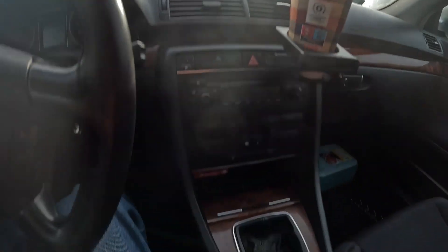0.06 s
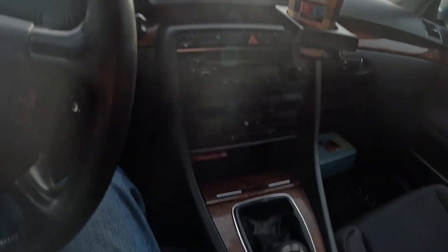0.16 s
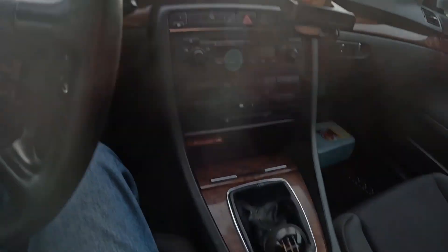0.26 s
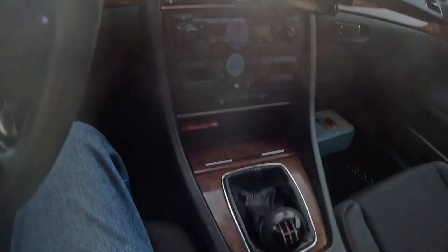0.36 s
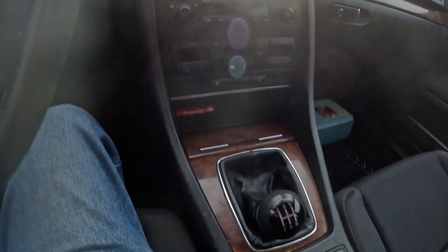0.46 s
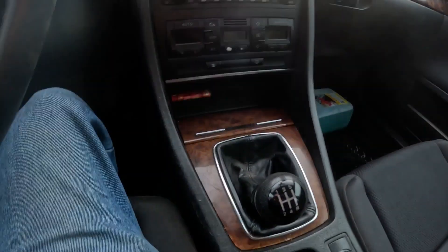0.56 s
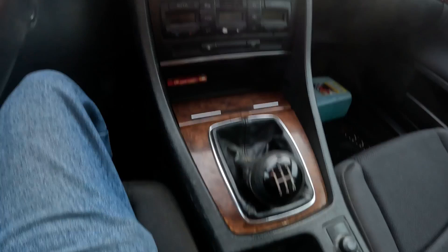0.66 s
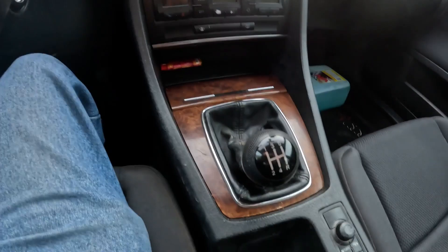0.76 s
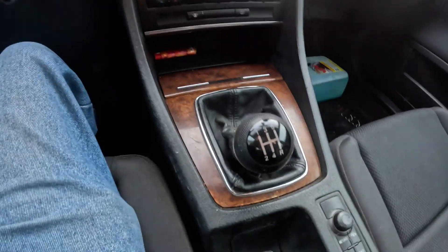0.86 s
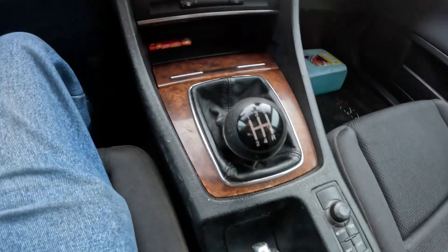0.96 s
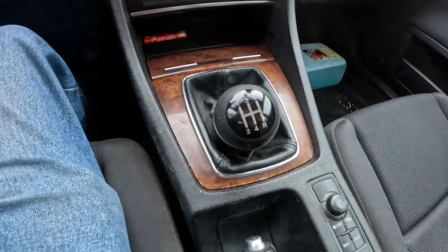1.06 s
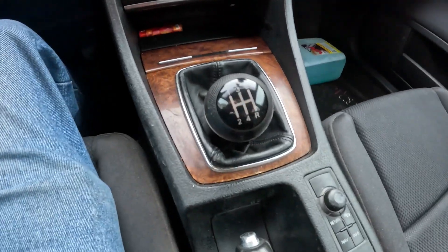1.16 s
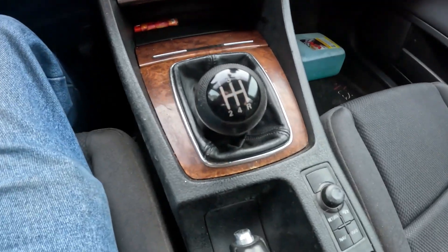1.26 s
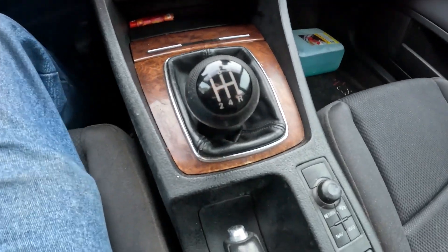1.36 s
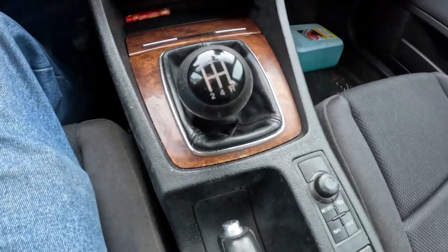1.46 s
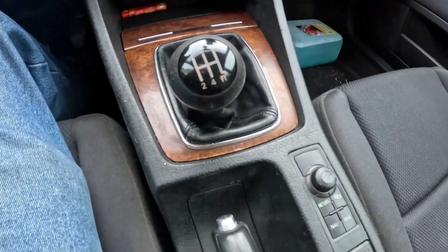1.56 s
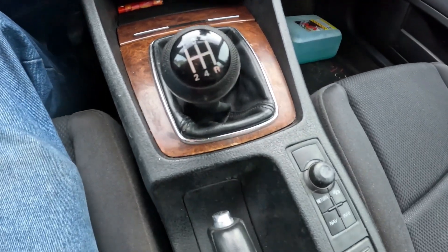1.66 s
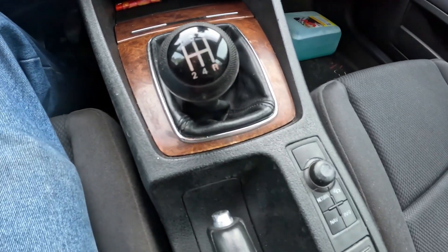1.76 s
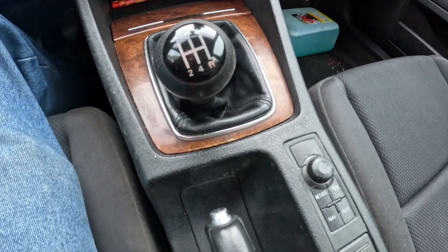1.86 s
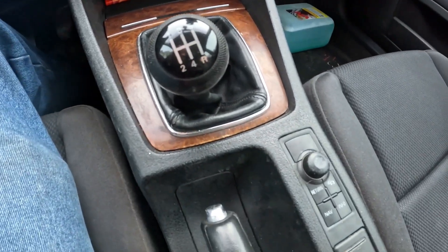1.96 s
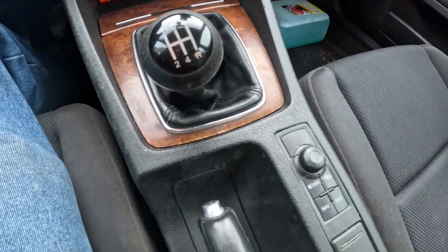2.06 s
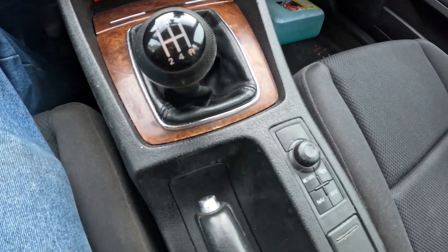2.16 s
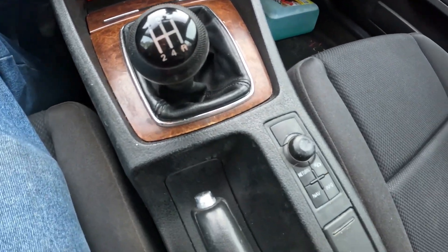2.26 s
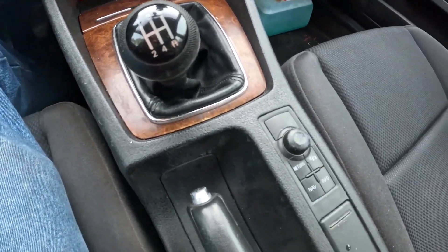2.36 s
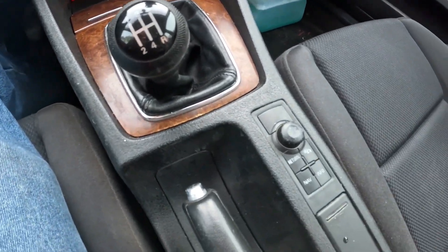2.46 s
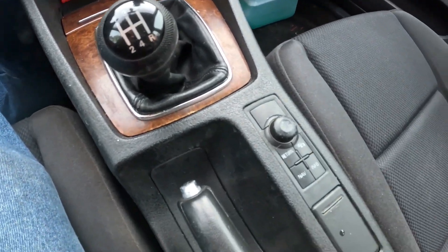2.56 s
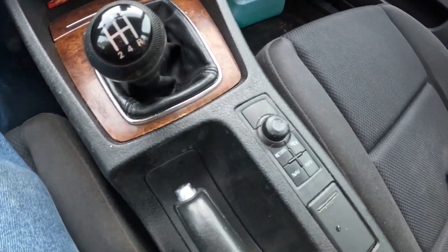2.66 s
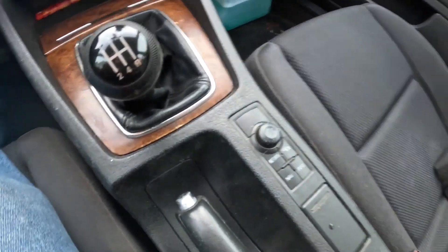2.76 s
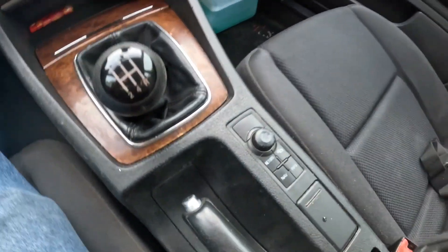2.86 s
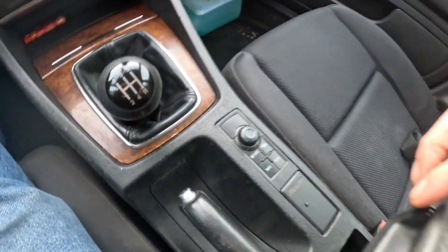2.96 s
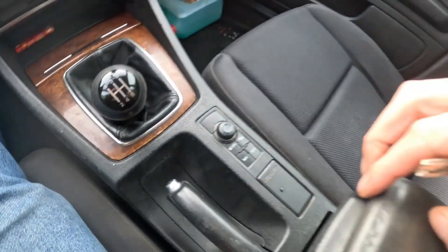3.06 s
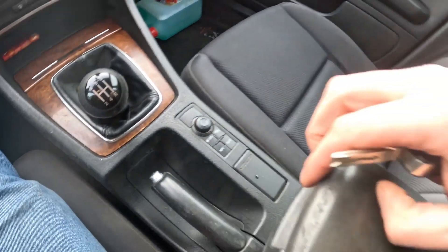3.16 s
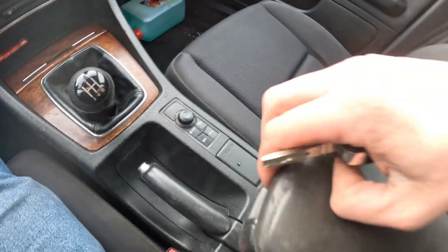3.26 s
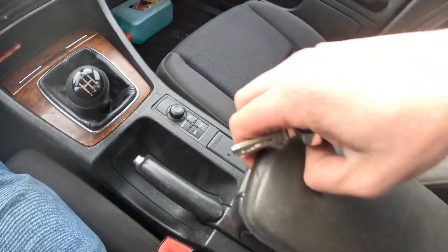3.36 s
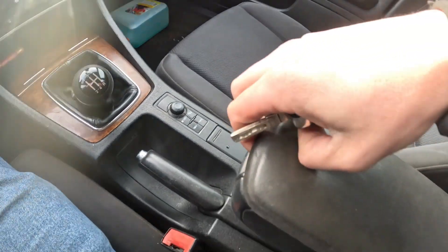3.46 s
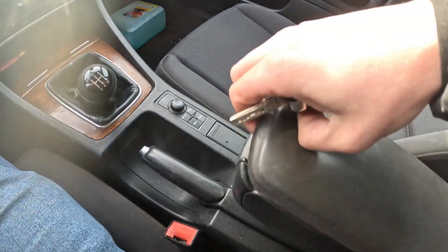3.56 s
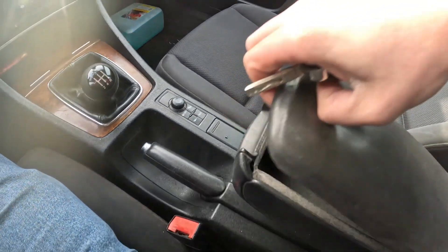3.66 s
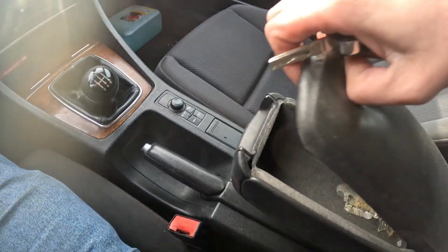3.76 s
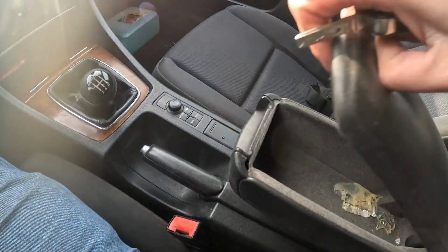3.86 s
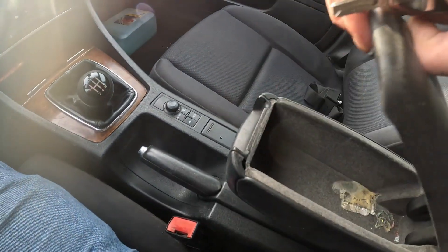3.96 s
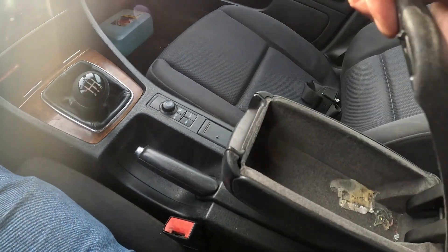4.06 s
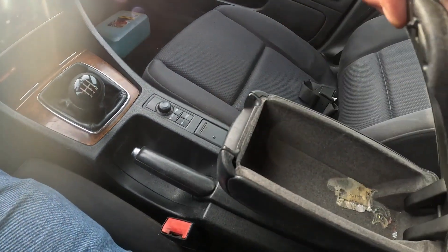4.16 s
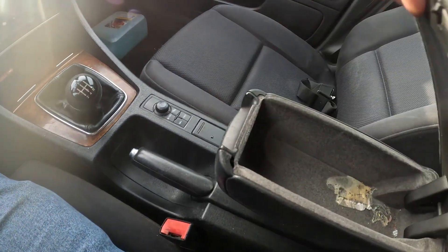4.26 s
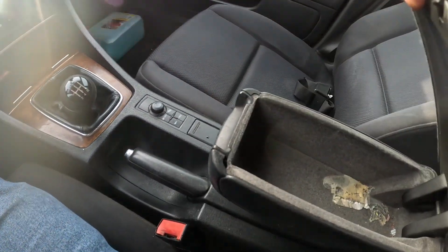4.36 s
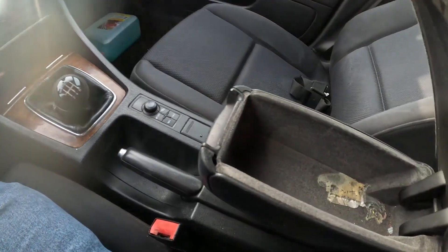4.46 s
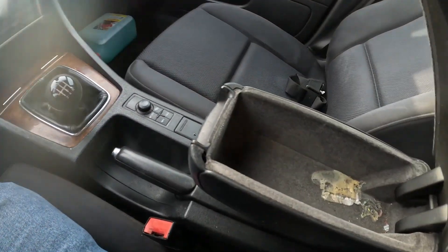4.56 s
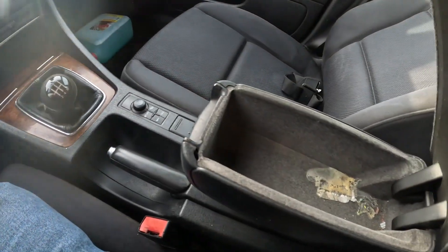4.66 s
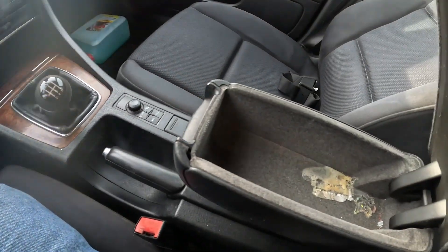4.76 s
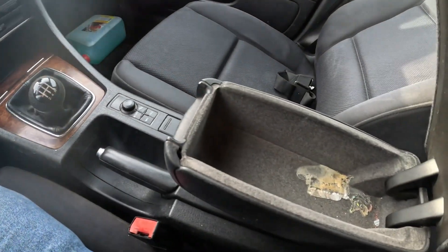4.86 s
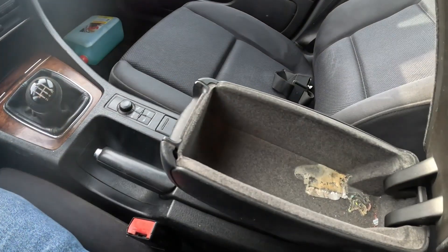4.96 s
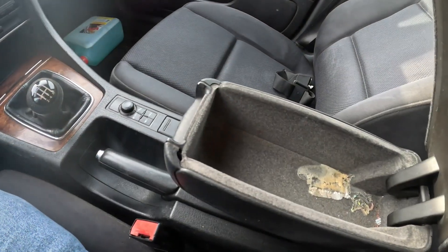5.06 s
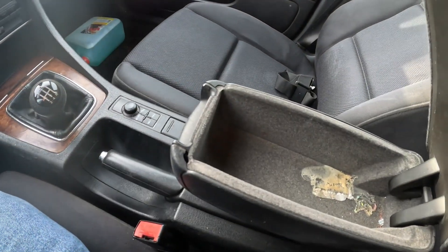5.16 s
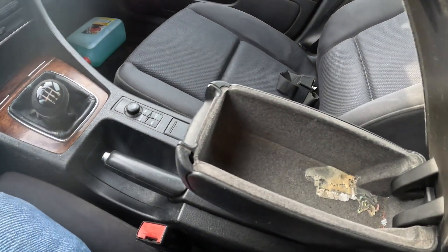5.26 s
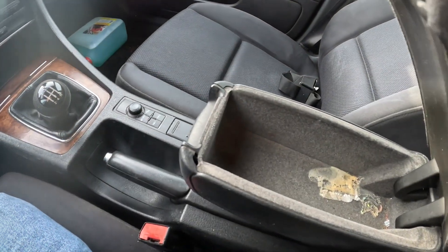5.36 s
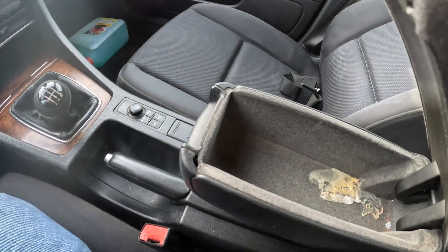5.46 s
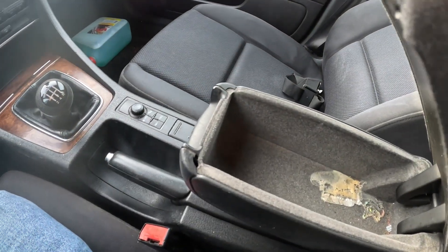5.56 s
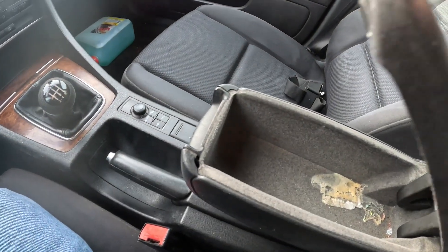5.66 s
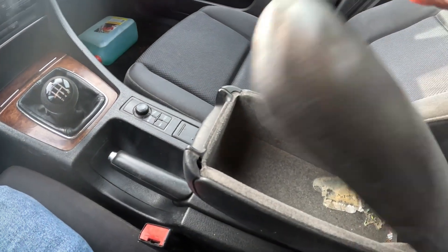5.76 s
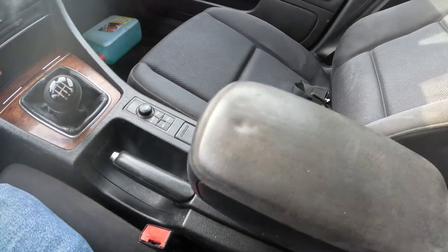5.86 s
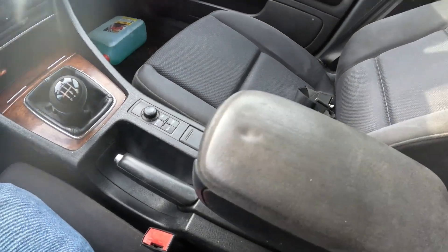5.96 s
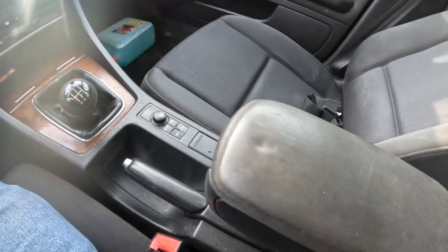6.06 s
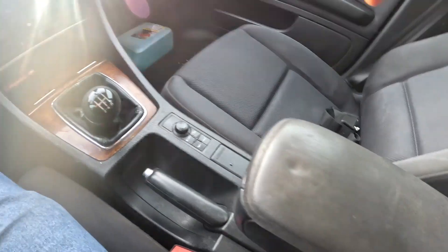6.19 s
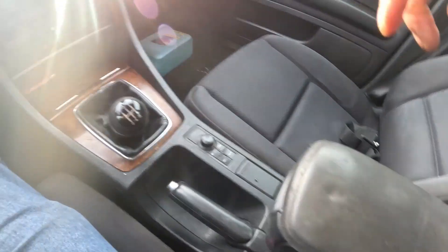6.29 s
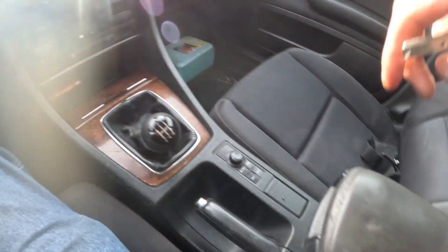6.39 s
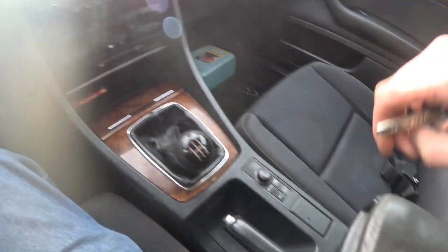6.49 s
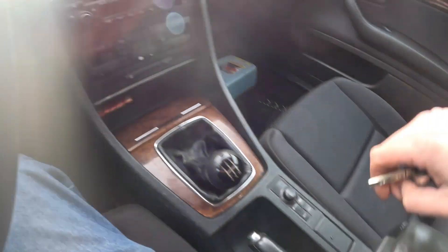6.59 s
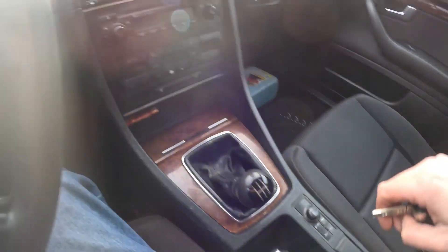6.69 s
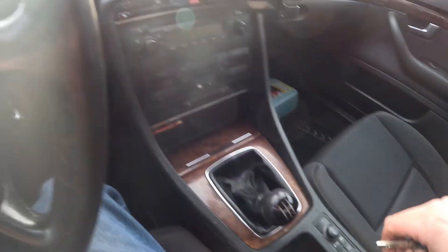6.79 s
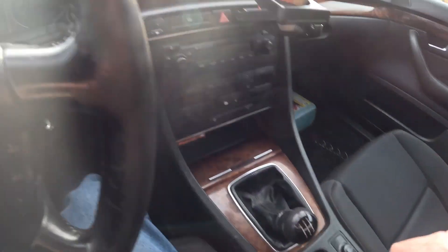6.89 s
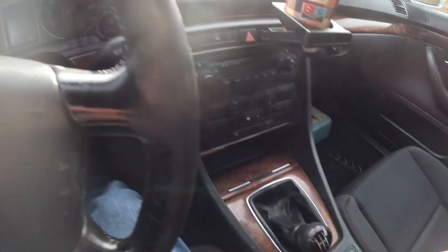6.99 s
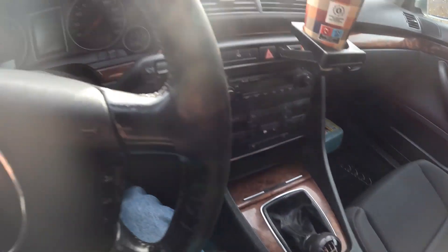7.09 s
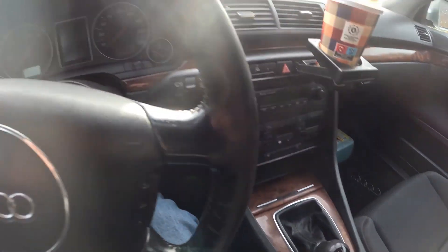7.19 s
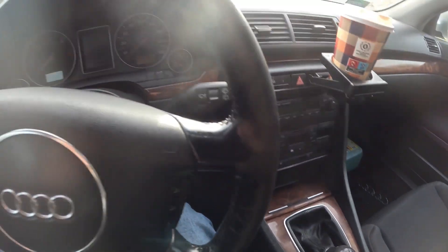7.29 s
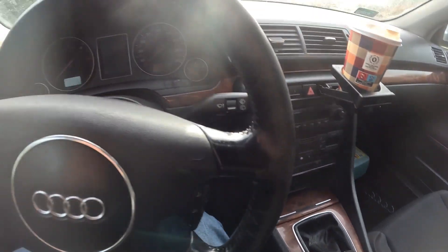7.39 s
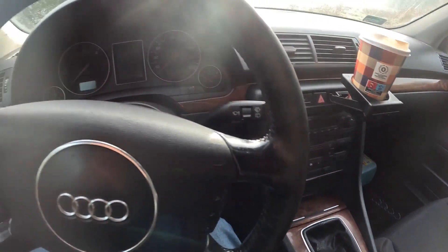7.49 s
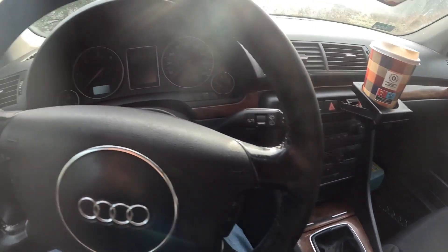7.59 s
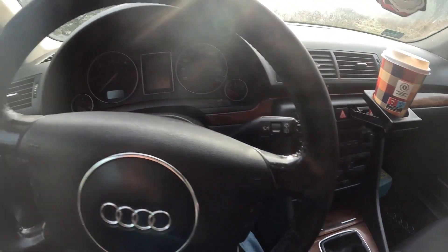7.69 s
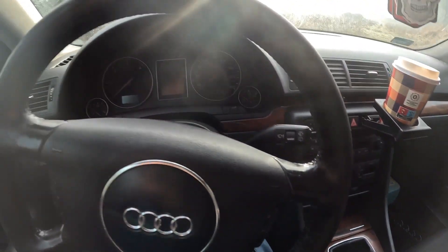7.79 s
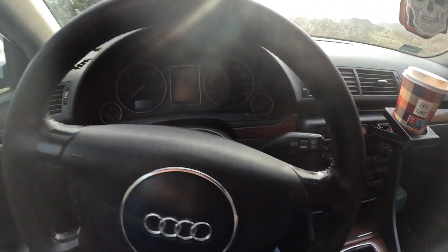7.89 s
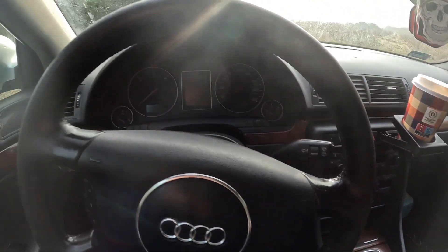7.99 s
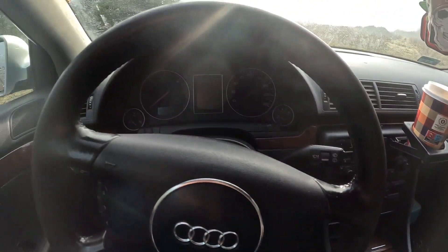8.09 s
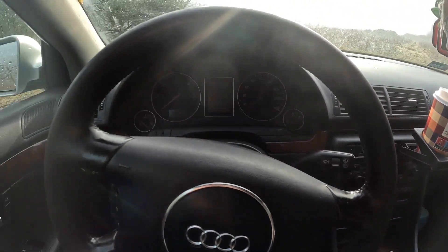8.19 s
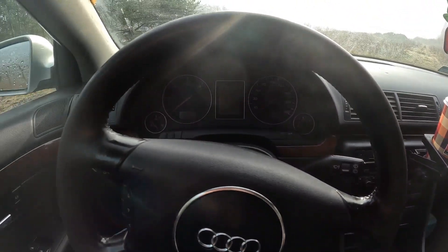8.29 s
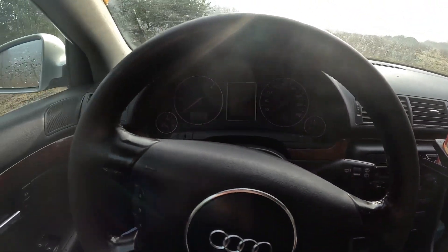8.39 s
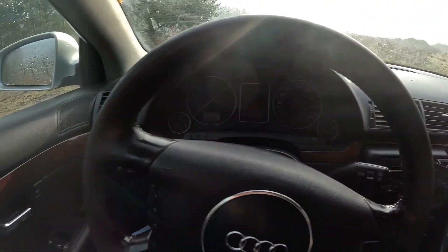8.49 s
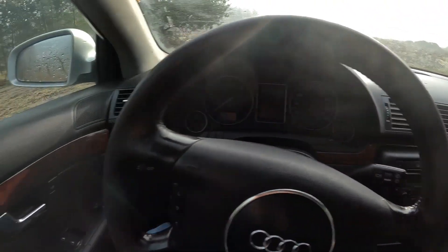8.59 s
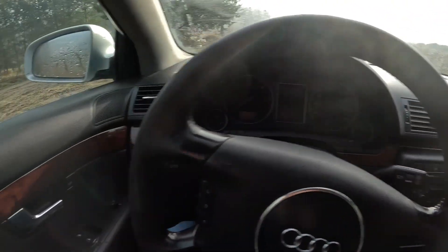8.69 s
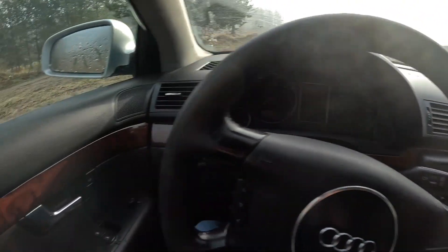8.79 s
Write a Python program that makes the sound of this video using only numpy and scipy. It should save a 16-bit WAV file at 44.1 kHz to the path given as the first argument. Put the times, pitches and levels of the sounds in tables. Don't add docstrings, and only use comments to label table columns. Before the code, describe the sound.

Faint cloth movement in a still car cabin, creaky fumbling and clicks as an armrest opens, one sharp hollow slam, then a tiny plastic ratchet.

```python
import sys
import numpy as np
from scipy import signal
from scipy.fft import rfft, irfft, next_fast_len
from scipy.io import wavfile
from scipy.ndimage import uniform_filter1d

SR = 44100
rng = np.random.default_rng(int(sys.argv[2]) if len(sys.argv) > 2 else 0)


def to_wav(s):
    ch = np.atleast_2d(s).T
    pcm = np.round(np.clip(ch, -1, 1) * 32767)
    wavfile.write(sys.argv[1], SR, pcm.astype(np.int16))


def volts_from_decibels(level):
    exponent = np.asarray(level, float) / 20
    return 10 ** exponent


N = 389844
T = np.arange(N) / SR

# t/s, push/dB, contact/ms, crack/dB, box pitch/factor
BLOWS = [
    (5.881, -46, 0.58, -46, 0.78),
    (5.8864, -25.5, 1.1, -44, 1.45),
    (5.8985, -15, 0.92, -27, 1.3),
    (5.9034, -15, 1.1, -28.5, 1.63),
    (5.9097, -1, 0.18, -6, 1),
]
BOUNCES = [
    (5.9918, -18, 0.7, -27.5, 0.95),
    (6.0326, -24, 1, -42, 1.05),
]
# f/Hz, level/dB, t60/s
BOX_MODES = [(64.3, -20, 0.17), (150, -23, 0.048), (215, 2, 0.061), (300, -4, 0.038), (355, -7, 0.022),
             (530, -23.5, 0.05), (700, -14, .03), (880, -7.5, 0.029), (1076, 1, 0.013), (1570, -9, 0.01),
             (2900, -11, .008), (3650, -10.5, 0.0055), (4430, -15, .008)]
# f/Hz, level/dB per Hz
CRACK_COLOUR = [(180, -21.5), (300, -15), (544, -29), (1130, -16), (1880, -19.5), (2190, -33),
                (2460, -26.5), (3480, -25.5), (4310, -34.5), (7830, -39.5), (15700, -66.5)]
# f/Hz, level/dB per Hz
CLATTER_COLOUR = [(250, -10), (450, 0.5), (700, 0), (1150, -3.5), (1600, -12.5), (2400, -24)]

# t/s, peak level/dB, snap level/dB, note f/Hz
CLICKS = [(1.068, -31.5, -17, 1260), (1.957, -43, 2.5, 1100), (2.898, -37, -1, 704),
          (3.821, -25.5, -11, 630), (3.885, -24, -4, 1180), (4.046, -23, -2, 1410), (4.146, -24.5, 0, 1240),
          (4.571, -35, -7.5, 470), (4.653, -27, -7, 704), (5.258, -28.5, -3.5, 1280),
          (7.964, -38, 5.5, 647)]
KNOCKS = [(.92, -34.5, -11.5, 1300), (2.834, -28.5, -1.5, 1570), (2.949, -41, 5, 657),
          (3.017, -24.5, -7, 1270), (3.36, -21, -11, 1110), (3.4, -33, -6.5, 670), (3.51, -26, 0.5, 1140),
          (3.558, -25.5, -12.5, 1130), (3.606, -17, -8, 593), (3.618, -18.5, -15, 426),
          (3.797, -34, -17, 650), (4.635, -23, -10, 1630), (5.467, -40.5, -30, 1030),
          (7.413, -45.5, -15, 1450), (8.774, -45.5, -34.5, 668)]
SETTLES = [(.76, -51, -6, 1200), (.893, -44.5, -13.5, 620), (2.789, -44, -10, 1270),
           (3.467, -35.5, -5, 980), (3.533, -27.5, -9.5, 980), (3.636, -37, -25, 636),
           (4.878, -47.5, -36, 970), (5.268, -37, -16, 1510), (5.574, -50.5, -30, 1050),
           (5.485, -52.5, -30, 1390), (7.316, -50, -30, 1220)]
# t/s, peak level/dB, note f/Hz
CRISP = [(.043, -48, 470), (.264, -54, 700), (.563, -53, 865), (5.718, -54.5, 2040), (1.443, -49, 1550),
         (1.479, -47, 640), (3.973, -47, 1610), (4.61, -52, 1580), (5.808, -44, 440), (6.045, -46, 2900),
         (6.769, -46.5, 8050), (6.793, -49.5, 641), (.435, -61, 610), (1.593, -48.5, 3200),
         (2.985, -46, 4500), (2.997, -35.5, 1300), (6.477, -55.5, 1300), (6.875, -54, 1198),
         (7.865, -58.5, 1300), (4.928, -56, 6000)]
DULL = [(1.523, -45, 1210), (2.89, -35, 740), (2.926, -32.5, 1320), (3.431, -37, 467), (3.733, -50, 583),
        (3.759, -37, 640), (3.783, -37, 636), (3.886, -31.5, 2220), (4.047, -31, 2170), (4.147, -32, 2160),
        (1.958, -50.5, 750), (4.4, -55, 700), (4.148, -36, 750), (3.575, -34, 1000), (5.484, -40.5, 517),
        (7.365, -45, 875), (7.439, -47, 1540)]
# f/Hz, level/dB per Hz
KNOCK_COLOUR = [(210, -34.5), (350, -19), (604, 5), (934, 4.5), (1550, 2.5), (1810, -7.5), (2160, -11),
                (2600, -13), (3380, -41.5), (5720, -120)]
# f/Hz, level/dB per Hz
SNAP_COLOUR = [(1120, -34), (1900, -8), (2750, -4), (3140, -1), (3920, -6.5), (6430, -10.5), (8160, -18.5),
               (9240, -22), (13400, -37.5), (15700, -51)]
# f/Hz, level/dB per Hz
THUD_COLOUR = [(35, -39.5), (60, -7), (182, 1), (280, 6), (400, 1.5), (449, -3), (534, -20), (600, -14.5),
               (780, -13), (1320, -120)]

# peak t/s, rise/s per 10 dB, fall/s per 10 dB, peak level/dB, hiss over cloth/dB
SHIFTS = [(0, .1, 0.6, -74.5, 0.5), (.88, 0.38, 0.35, -63, -7), (1.2, 0.29, 0.03, -63.5, -4),
          (1.48, 0.35, 0.33, -72, -4.5), (1.68, 0.34, 0.08, -64.5, -3.5), (2.04, 1.5, 1.5, -81.5, 0),
          (2.6, 0.27, 0.15, -71, -2.5), (6.5, 0.33, 0.5, -71, -4), (7.0, 0.2, -0.07, -63.5, 0),
          (7.4, 1.08, 0.5, -68, -7), (7.57, 0.42, -0.08, -69, 0.5), (7.9, 0.4, 0.17, -79, -2.5),
          (8.83, 0.24, -6.8, -71.5, -2)]
HANDLING = [(2.82, 0.055, 0.21, -58, -4), (2.99, 0.16, 0.13, -53.5, -8), (3.33, 0.25, 0.16, -48.5, -8),
            (3.6, 0.77, 0.081, -58, -3.5), (3.79, 0.23, 0.34, -61, -5.5), (4.3, 0.57, 0.08, -67, -4.5),
            (4.5, 0.11, 0.21, -68.5, -7.5), (4.62, 0.079, 0.11, -59.5, -6), (4.89, 0.16, 0.19, -71.5, 0),
            (5.29, 0.13, 0.079, -66.5, -5), (5.37, 0.063, 0.082, -67, -6), (5.76, 0.044, 0.4, -69.5, -1.5),
            (5.91, 0.036, 0.021, -45.5, -14.5), (6.02, 0.07, 0.046, -63, -17)]
# t/s, level/dB
LOAD = [(0, -75), (.35, -80.5), (.95, -65.5), (1.36, -74.5), (1.6, -73), (2.75, -79.5), (2.83, -69.5),
        (3.63, -48), (3.96, -79), (5.09, -79), (5.54, -63.5), (5.75, -69.5), (6.3, -78.5), (6.58, -66),
        (7.0, -65), (7.21, -68.5), (8.28, -77), (8.83, -69.5)]
# f/Hz, level/dB per Hz
SEAT_COLOUR = [(53, -29.5), (90, -0.5), (167, 2), (294, -0.5), (437, -6.5), (567, -9), (735, -13),
               (900, -21.5), (1170, -53), (1980, -120)]
# f/Hz, level/dB per Hz
CLOTH_COLOUR = [(350, -34), (600, -15), (735, -18), (841, -16), (1090, -2.5), (1300, -3), (1430, -3),
                (2050, -10.5), (2600, -21), (3380, -50.5), (5720, -120)]
# f/Hz, level/dB per Hz
HISS_COLOUR = [(1180, -25.5), (2000, -4), (2460, -2.5), (3330, -1.5), (4500, -5.5), (5030, -2),
               (5630, -6.5), (7220, -6.5), (8290, -12), (12200, -21), (15700, -47.5)]
# start t/s, end t/s, slips/per s, depth/0-1, creak level/dB
DRAG = [
    (2.79, 3.094, 44, 0.2, -46),
    (3.113, 3.265, 88, 0, -36.5),
    (3.252, 3.359, 52, 0.1, -34.5),
    (3.373, 3.6, 82, 0.1, -42),
    (3.669, 3.841, 40, 0, -41.5),
    (5.337, 5.452, 61, 0, -58),
]
# f/Hz, level/dB, t60/s
LEATHER_MODES = [(357, 5.5, 0.0154), (563, 7.5, 0.013), (1140, -5, 0.0052)]
# start t/s, end t/s, start f/Hz, end f/Hz, level/dB
RIDGES = [(0.56, 1.1, 1330, 1100, -68.5), (1.0, 1.3, 1150, 1350, -67), (1.1, 1.28, 4150, 4250, -68.5),
          (1.503, 1.75, 2800, 3500, -75), (1.5, 1.83, 5200, 5220, -72), (1.5, 1.79, 1300, 1500, -70),
          (2.25, 2.69, 4900, 5900, -77), (3.041, 3.36, 3000, 3700, -62), (3.18, 3.36, 5000, 4900, -59.5),
          (3.047, 3.367, 1350, 1640, -57), (5.293, 5.423, 1500, 1700, -68), (5.33, 5.453, 300, 430, -62.5),
          (7.42, 7.651, 3200, 3600, -66), (7.45, 7.619, 1600, 1503, -69), (7.8, 8.842, 132, 131, -69),
          (.46, 0.53, 7500, 7600, -71.5), (3.631, 3.86, 880, 580, -59.5), (3.12, 3.447, 2100, 2500, -61),
          (7.42, 7.629, 2290, 2360, -71), (0.56, 0.84, 4500, 4600, -77), (2.25, 2.69, 1200, 1480, -73),
          (1.96, 2.12, 3000, 3000, -79), (5.46, 5.64, 1000, 750, -66), (5.935, 5.995, 950, 750, -43),
          (6.0, 6.036, 1100, 900, -48), (4.42, 4.62, 1400, 1700, -71.5)]

# t/s, peak level/dB
RATCHET = [(6.9744, -35.5), (6.9898, -39), (7.0119, -34), (7.034, -39.5), (7.052, -38), (7.0736, -36.5),
           (7.1, -37), (7.214, -37), (7.3626, -48.5), (7.5999, -50.5), (7.669, -55)]
# t/s, level/dB
RUB = [
    (7.36, -83),
    (7.43, -66.5),
    (7.61, -68.5),
    (7.635, -81),
]
# f/Hz, level/dB per Hz
PART_COLOUR = [(240, -31.5), (400, -1), (552, -10.5), (786, -0.5), (931, -10), (1300, -2.5), (2200, -13.5),
               (2770, -7.5), (3500, 0), (4000, -9), (5360, -6), (8620, -16), (15700, -50)]

# t/s, level/dB, f/Hz, t60/s
BUMPS = [(0.762, -34, 72, 0.099), (0.574, -38, 32.3, 0.13), (1.075, -40, 215, 0.073),
         (2.845, -34, 63.6, 0.19), (3.379, -28, 44.4, 0.059), (3.611, -20, 379, 0.079),
         (3.631, -25, 74.5, 0.061), (3.652, -21.5, 43.6, 0.071), (4.261, -46, 160, 0.036),
         (4.574, -13, 116, 0.0088), (4.639, -32, 497, 0.051), (4.654, -20, 150, 0.037),
         (5.958, -33, 418, 0.05), (5.9904, -14, 271, 0.045), (6.0322, -18.5, 260, 0.045),
         (0.474, -51.5, 150, .06), (7.44, -45, 60, .15), (6.037, -22.5, 71.4, 0.13),
         (3.536, -35, 205, 0.081), (4.047, -43, 200, 0.027), (7.318, -57, 300, .05),
         (8.777, -43.5, 167, 0.1)]
# t/s, level/dB
HOLLOW = [(5.467, -37.5), (5.502, -44), (5.575, -41.5), (5.587, -40.5), (5.735, -54), (5.755, -52.5)]
# t/s, level/dB
GRIP = [(0, -58), (1.36, -61), (1.54, -56.5), (2.68, -60), (2.87, -45), (3.15, -53.5), (3.68, -53),
        (4.42, -63.5), (4.55, -52), (5.09, -60), (5.54, -54), (5.72, -65.5), (5.93, -47.5), (6.12, -52),
        (6.3, -64), (7.01, -54.5), (7.3, -65.5), (8.83, -61.5)]
# f/Hz, level/dB per Hz
RUMBLE_COLOUR = [(8.8, -28), (15, 9.5), (27, -4), (42, 1.5), (81, -12), (108, -24.5), (130, -17.5),
                 (170, -59), (290, -120)]

# t/s, left minus right/dB
PAN = [(0.0, 2.5), (0.76, -0.5), (1.9, 2.5), (2.7, 0.5), (3.6, 0), (4.0, -1), (5.5, -2.5), (6.3, 0),
       (7.0, 0.5), (8.84, 1.5)]
# f/Hz, lead/radians, louder/dB
PORTS = [(300, -0.1, -0.35), (700, 0.05, -2), (1300, -0.6, 0), (3000, -0.7, 0.5), (5500, -0.1, -0.5),
         (10000, -0.05, 2.5)]


def lid():
    box, crack, clatter = np.zeros(N), np.zeros((2, N)), np.zeros((2, N))
    t = np.arange(SR // 4) / SR
    crack_shape = decay(t, 0.013) + volts_from_decibels(-20.0) * decay(t, 0.065) + volts_from_decibels(-31.5) * decay(t, 0.12)
    upper = [mode for mode in BOX_MODES if mode[0] > 500]
    hits = [(BOX_MODES, row) for row in BLOWS] + [(upper, row) for row in BOUNCES]
    for modes, (s, push_db, contact_ms, crack_db, pitch) in hits:
        push = np.sin(np.pi * np.clip(t[:400] / (contact_ms / 1000), 0, 1))
        add(box, volts_from_decibels(push_db) * ring(push / push.sum(), modes, pitch), s)
        noise = rng.standard_normal((2, 2, len(t)))
        add(crack, volts_from_decibels(crack_db) * crack_shape * pair(noise[0], 0.35), s)
        clatter_t60 = 0.12 * volts_from_decibels(0.2 * push_db)
        add(clatter, volts_from_decibels(-26.5 + 0.45 * push_db) * decay(t, clatter_t60) * pair(noise[1], 0.2), s)
    lining = colour(clatter * volts_from_decibels(1.5 * walk(150)), CLATTER_COLOUR)
    return box * sides(0.1) + colour(crack, CRACK_COLOUR) * sides(0.6) + lining


def ticks():
    t = np.arange(SR // 8) / SR
    knock, snap, thud, notes = np.zeros((4, 2, N))
    rise = 1 - np.exp(-t / 0.001)
    tail = volts_from_decibels(-36.0) * decay(t, 0.34)
    faint = [(s, db, -1, hz) for s, db, hz in CRISP] + [(s, db, -33, hz) for s, db, hz in DULL]
    kinds = ((CLICKS, -26, 0.034), (KNOCKS, -5, 0.048), (SETTLES, -5.5, 0.097), (faint, -10, 0.031))
    for rows, thud_db, t60 in kinds:
        for s, peak_db, snap_db, note_hz in rows:
            noise = rng.standard_normal((4, 2, len(t)))

            def shape(slow):
                return volts_from_decibels(peak_db) * rise * (decay(t, slow * t60) + tail)

            start = s - 0.0005
            add(knock, volts_from_decibels(-7.0) * shape(0.9) * pair(noise[0], 0.15), start)
            add(snap, volts_from_decibels(snap_db - 3.0) * shape(0.7) * pair(noise[1], 0.4), start)
            add(thud, volts_from_decibels(thud_db - 3.0) * shape(1.1) * pair(noise[2], 0.08), start)
            width_hz = 0.24 * note_hz
            b, a = signal.iirpeak(note_hz, note_hz / width_hz, SR)
            note = signal.lfilter(np.convolve(b, b), np.convolve(a, a), shape(0.81) * pair(noise[3], 0.15))
            add(notes, volts_from_decibels(-8.0) * note * np.sqrt(SR / width_hz), start)
    return colour(knock, KNOCK_COLOUR) + colour(snap, SNAP_COLOUR) + colour(thud, THUD_COLOUR) + notes


def rustle():
    hand = strokes(HANDLING, 2.753)
    body = strokes(SHIFTS, -1)
    cloth_db, hiss_db = 10 * np.log10(body + hand)
    load = np.hypot(envelope(LOAD), np.sqrt(hand[0]) * volts_from_decibels(-1))
    gate, creak = leather_drag()
    noise = rng.standard_normal((4, 2, N))
    seat = colour(pair(noise[0], 0.15) * gate * load * volts_from_decibels(2.7 * walk(25) + 0.5), SEAT_COLOUR)
    cloth_level = volts_from_decibels(cloth_db + 0.43 * walk(34) - 1.45) + volts_from_decibels(-84.5)
    cloth = colour(pair(noise[1], 0.52) * gate * cloth_level, CLOTH_COLOUR)
    hiss_level = volts_from_decibels(hiss_db + 1.5 * walk(900) + 1.0) + volts_from_decibels(-81.5)
    hiss = colour(pair(noise[2], 0.61) * hiss_level, HISS_COLOUR)
    whistle = signal.lfilter(*signal.iirpeak(5100, 4.5, SR), noise[3])
    jacket = whistle * np.sqrt(body[1]) * volts_from_decibels(2.0 + 1.5 * walk(4))
    return seat + cloth + jacket + patchy(hiss, np.maximum(hiss_db, -84)) + creak


def strokes(rows, start):
    power = np.full((2, N // 64 + 1), 1e-11)
    t = np.linspace(0, T[-1], power.shape[1])
    for s, rise, fall, peak_db, hiss_db in rows:
        away = np.where(t < s, (s - t) / max(rise, 0.01), (t - s) / max(fall, 0.01))
        db = peak_db - 10 * away ** 1.6
        power += volts_from_decibels(db + np.array([[0], [hiss_db]])) ** 2
    power *= 1 / (1 + np.exp(np.clip((start - t) / 0.012, -50, 50)))
    return np.array([np.interp(T, t, p) for p in power])


def patchy(x, effort_db):
    lows = [signal.sosfiltfilt(signal.butter(2, hz, fs=SR, output="sos"), x) for hz in (2900, 4300, 6600)]
    bands = np.diff([0 * x] + lows + [x], axis=0)
    lift_db = 0.5 * (effort_db + 69.5)
    return sum(band * volts_from_decibels(lift_db * (k < 2) + 2.2 * walk(3)) for k, band in enumerate(bands))


def leather_drag():
    gate, creak = np.ones(N), np.zeros(N)
    for t0, t1, rate, depth, creak_db in DRAG:
        chance = rng.standard_normal((64, 2))
        times = t0 + np.cumsum(np.exp(0.1 * chance[:, 0])) / rate
        jerks = np.zeros(N)
        jerks[(times * SR).astype(int)] = volts_from_decibels(1.5 * chance[:, 1]) * (times < t1)
        creak += volts_from_decibels(creak_db) * jerks
        shaken = signal.lfilter([1], [1, -np.exp(-1 / (0.0025 * SR))], jerks)
        inside = (T > t0) & (T < t1)
        power = shaken[inside] ** 2
        gate[inside] = np.sqrt(1 - depth + depth * power / np.mean(power))
    return gate, ring(creak, LEATHER_MODES, 0.854)[:N]


def ridges():
    out = np.zeros((2, N))
    for t0, t1, from_hz, to_hz, db in RIDGES:
        u = np.linspace(0, 1, int((t1 - t0) * SR))
        k = int(2 * SR / (0.22 * (from_hz + to_hz)))
        noise = rng.standard_normal((2, 2, SR + SR // 4))[..., :len(u)]
        slow = uniform_filter1d(uniform_filter1d(noise, k), k) * np.sqrt(1.5 * k)
        phase = 2 * np.pi * np.cumsum(from_hz + (to_hz - from_hz) * u) / SR
        band = slow[:, 0] * np.cos(phase) + slow[:, 1] * np.sin(phase)
        add(out, volts_from_decibels(db) * np.sin(np.pi * u) ** 0.74 * pair(band, 0.4), t0)
    return out


def plastic_part():
    t = np.arange(SR // 8) / SR
    force = volts_from_decibels(np.interp(T, *np.transpose(RUB), left=-120, right=-120) + 1.5 * walk(41))
    tooth = (1 - np.exp(-t / 0.00058)) * decay(t, 0.054)
    for s, peak_db in RATCHET:
        add(force, volts_from_decibels(peak_db - 4.5) * tooth, s - 0.0005)
    return colour(force * pair(rng.standard_normal((2, N)), 0.4), PART_COLOUR)


def bumps():
    out, t = np.zeros(N), np.arange(SR // 4) / SR
    rise = 1 - np.exp(-t / 0.0006)
    hollow = [(s, db, 560, 0.066) for s, db in HOLLOW]
    for s, db, hz, t60 in list(BUMPS) + hollow:
        add(out, -volts_from_decibels(db) * np.sin(2 * np.pi * hz * t) * rise * decay(t, t60), s)
    return out


def grip_rumble():
    noise = colour(pair(rng.standard_normal((2, N)), 0.26), RUMBLE_COLOUR, size=16384)
    return noise * envelope(GRIP) * volts_from_decibels(2.0 * walk(7.9) + 4.5)


def door():
    start_hz, glide, seals_settle_s = 39.6, 1.04, 0.23
    phase = 2 * np.pi * start_hz * (T - glide * T ** 2 / 2)
    fade = 1 / (1 + np.exp(np.minimum((T - seals_settle_s) / 0.0092, 50)))
    return volts_from_decibels(-28.5 - 66 * T) * np.sin(phase - 0.4) * fade


def ring(push, modes, pitch):
    t = np.arange(SR // 2) / SR
    body = np.zeros(len(t))
    for hz, db, t60 in modes:
        onset = np.exp(-t / 0.0022) - 1 if hz < 650 else 1
        body += onset * volts_from_decibels(db) * np.sin(2 * np.pi * hz * pitch * t) * decay(t, t60)
    return signal.fftconvolve(push, body)


def decay(t, t60):
    return 1000.0 ** (-t / t60)


def envelope(points):
    return volts_from_decibels(np.interp(T, *np.transpose(points)))


def walk(rate):
    k = int(SR / rate)
    held = np.repeat(rng.standard_normal(N // k + 1), k)
    return 1.3 * uniform_filter1d(uniform_filter1d(held, k), k)[:N]


def colour(x, points, size=4096):
    hz, db = np.transpose(points)
    octaves = np.log2(np.maximum(np.fft.rfftfreq(size, 1 / SR), 1))
    outside = np.maximum(np.log2(hz[0]) - octaves, 0) + np.maximum(octaves - np.log2(hz[-1]), 0)
    gain_db = np.maximum(np.interp(octaves, np.log2(hz), db) - 36 * outside, -100)
    cepstrum = irfft(gain_db * np.log(10) / 20)
    cepstrum[1:size // 2] *= 2
    cepstrum[size // 2 + 1:] = 0
    taps = irfft(np.exp(rfft(cepstrum)))
    return signal.fftconvolve(x, taps[None] / np.sqrt(np.sum(taps ** 2)), axes=1)[:, :N]


def pair(noise, spread):
    return (noise[0] + spread * noise[1] * np.array([[1], [-1]])) / np.sqrt(1 + spread ** 2)


def sides(pan_db):
    return volts_from_decibels(np.array([pan_db, -pan_db]).reshape(2, -1) / 2)


def add(out, sound, s):
    i = int(s * SR)
    n = min(sound.shape[-1], N - i)
    out[..., i:i + n] += sound[..., :n]


def phone_ports(air):
    size = next_fast_len(N)
    octaves = np.log2(np.fft.rfftfreq(size, 1 / SR) + 1)
    hz, lead, louder_db = np.transpose(PORTS)
    phase = np.interp(octaves, np.log2(hz), lead)
    level_db = np.interp(octaves, np.log2(hz), louder_db)
    half = np.exp(0.5j * phase) * volts_from_decibels(level_db / 2)
    return irfft(rfft(air, size) * np.array([half, 1 / half]), size)[:, :N]


def scene():
    turn = sides(np.interp(T, *np.transpose(PAN)))
    air = lid() + (rustle() + ridges() + ticks() + plastic_part()) * turn
    return grip_rumble() + (bumps() + door()) * sides(-0.915) + phone_ports(air)


def low_pass(x):
    return signal.sosfilt(signal.butter(12, 15840, fs=SR, output="sos"), x)


def record(dry):
    top = signal.butter(8, 15600, fs=SR, output="sos")
    mix = signal.sosfilt(top, np.clip(dry, -1, 1))
    return low_pass(mix)


dry = scene()
out = record(dry)
to_wav(out)
```